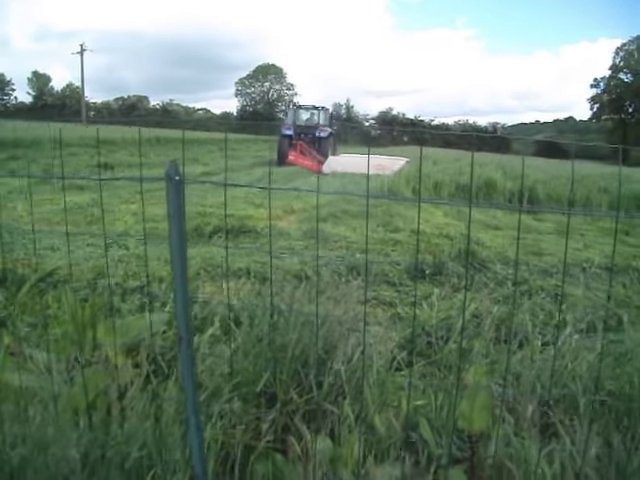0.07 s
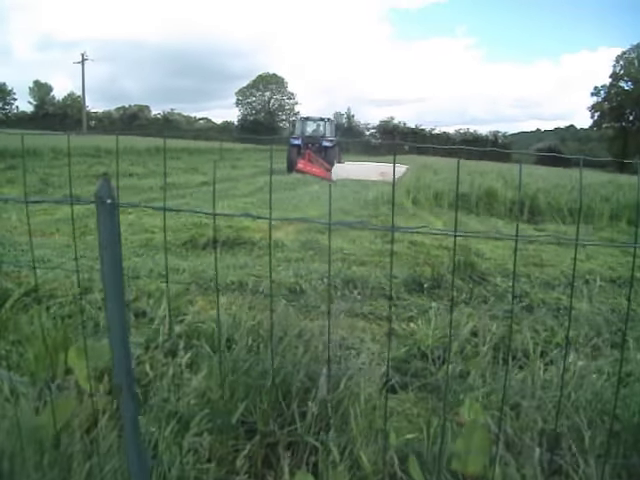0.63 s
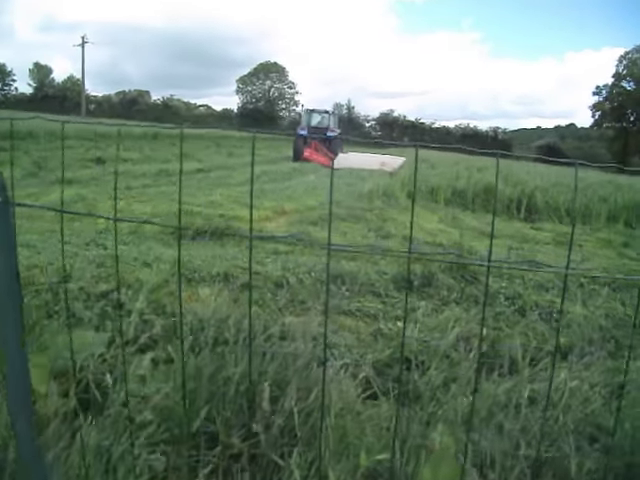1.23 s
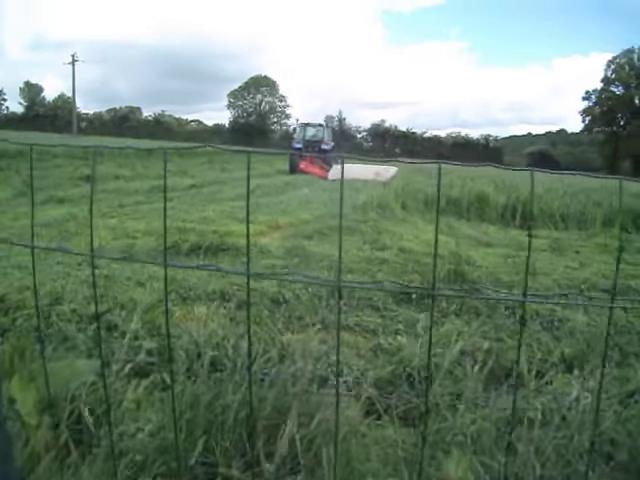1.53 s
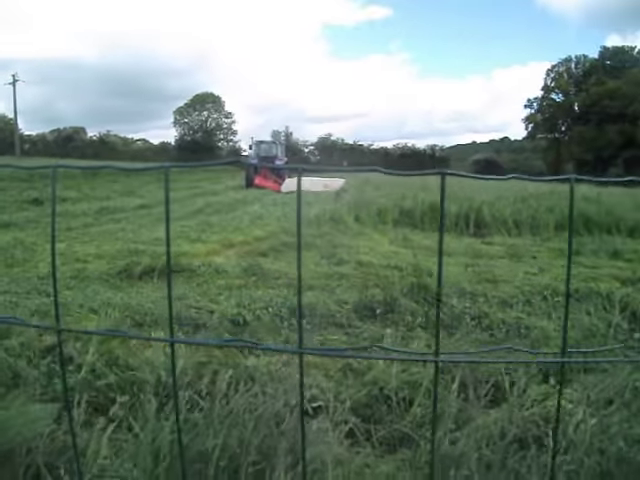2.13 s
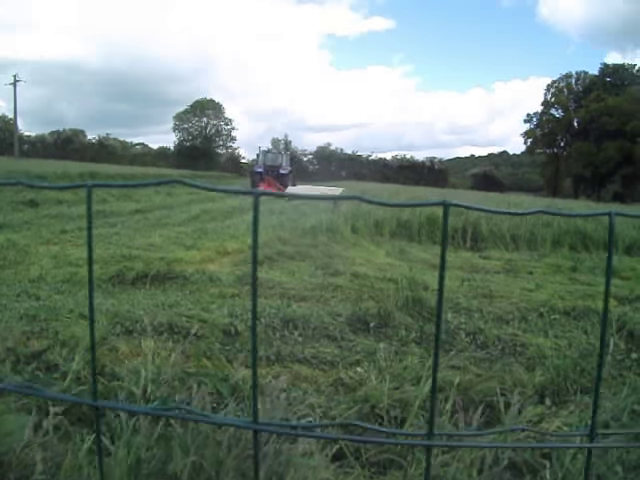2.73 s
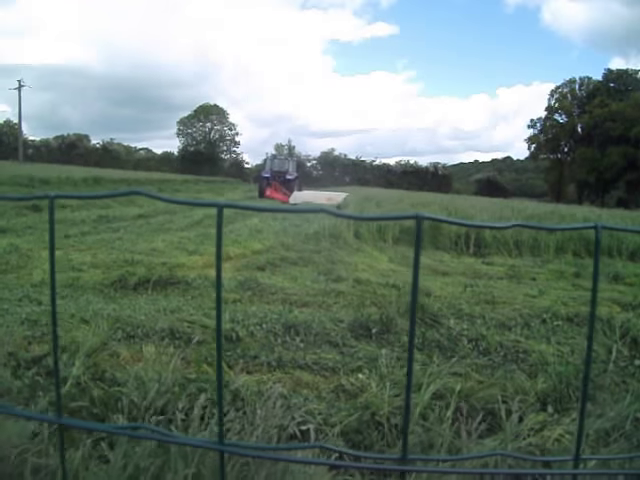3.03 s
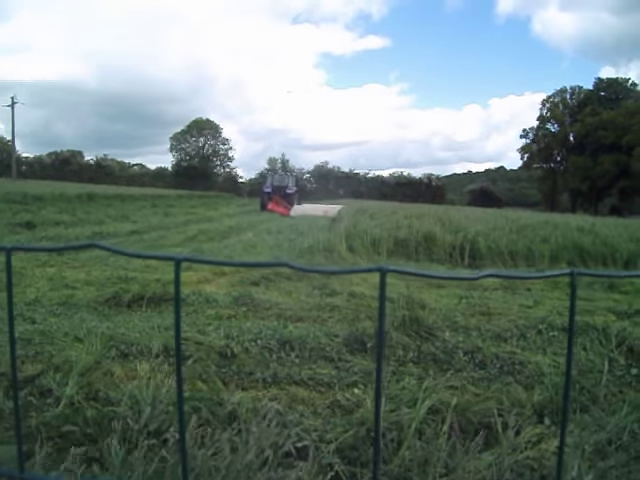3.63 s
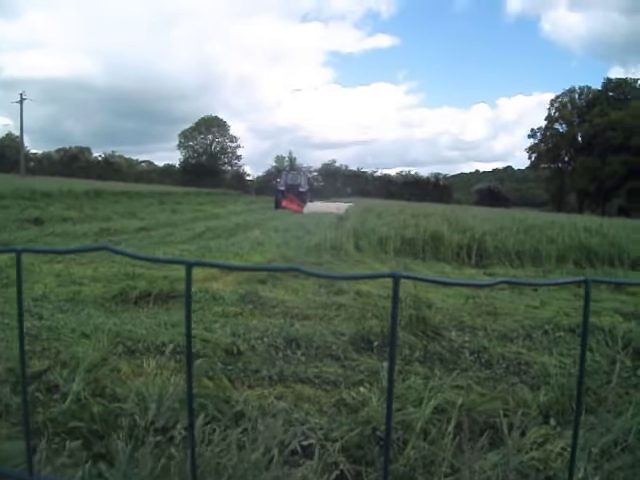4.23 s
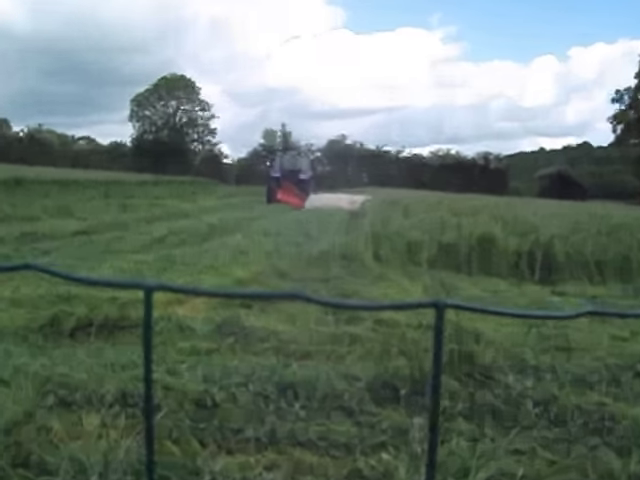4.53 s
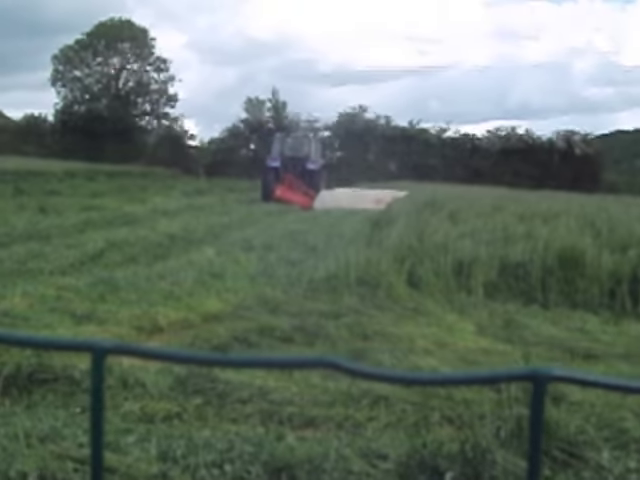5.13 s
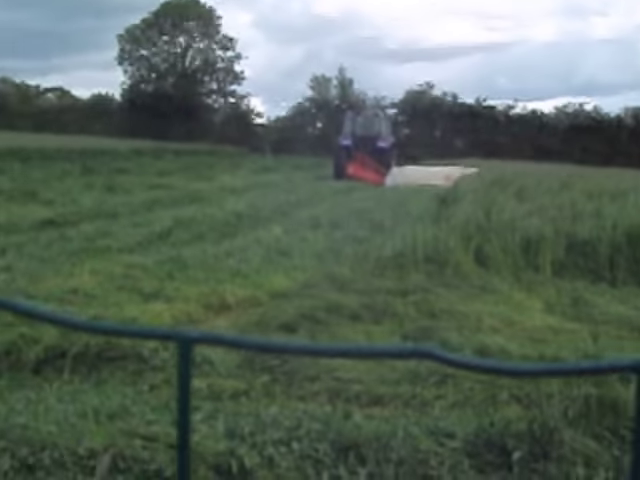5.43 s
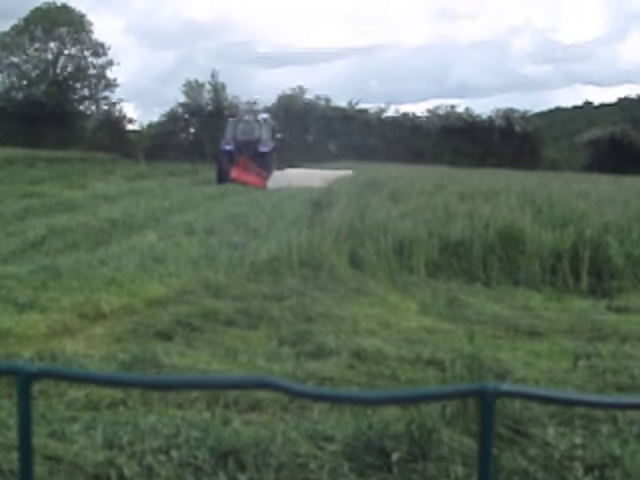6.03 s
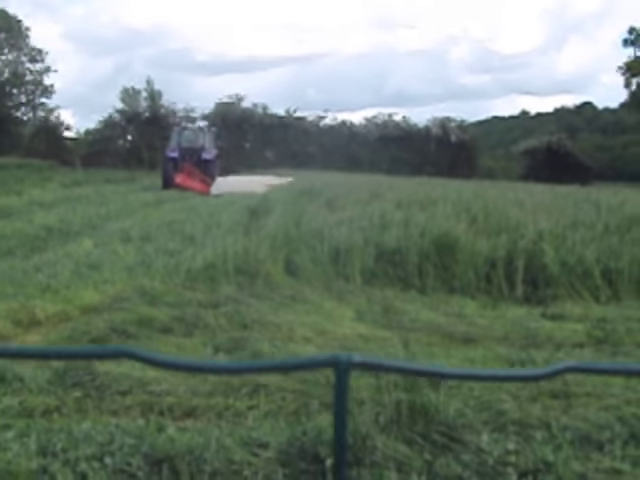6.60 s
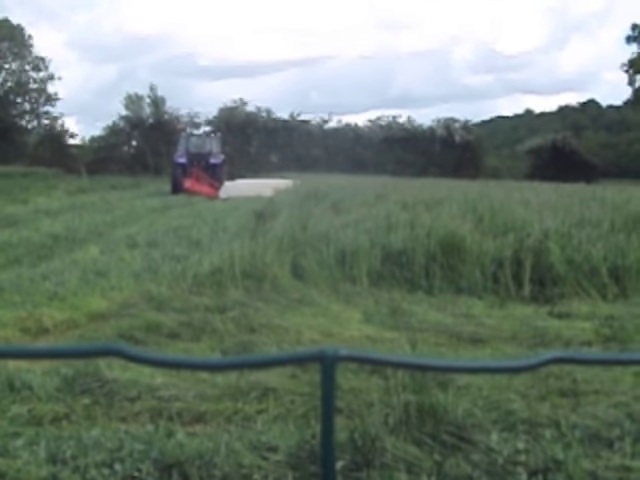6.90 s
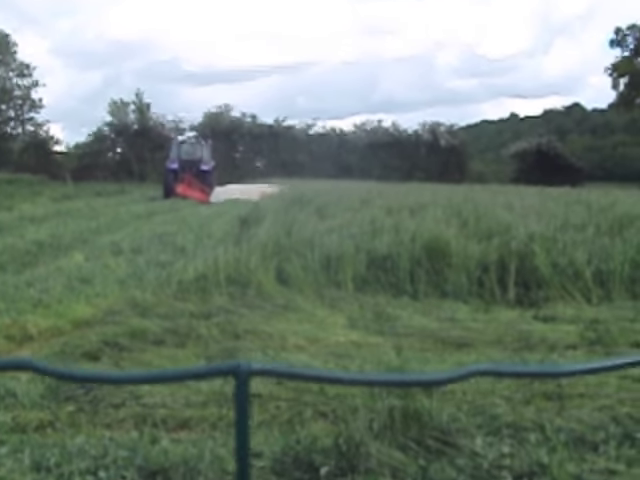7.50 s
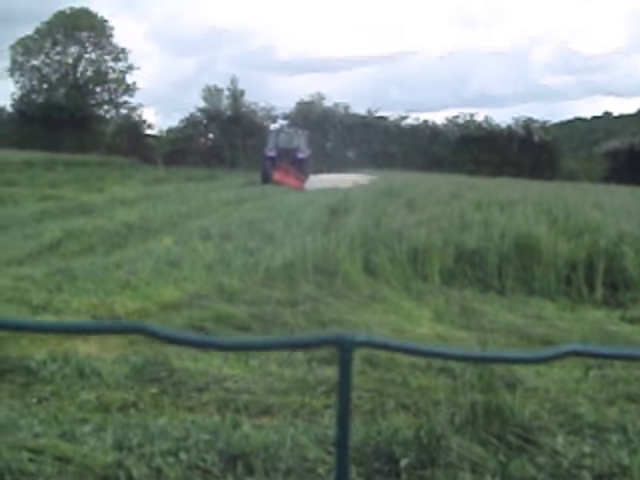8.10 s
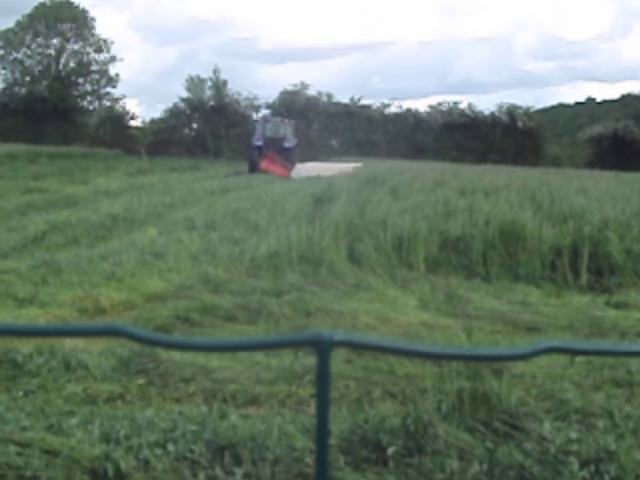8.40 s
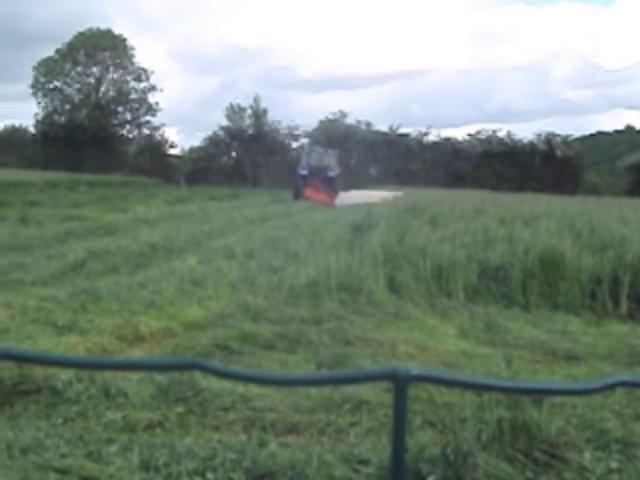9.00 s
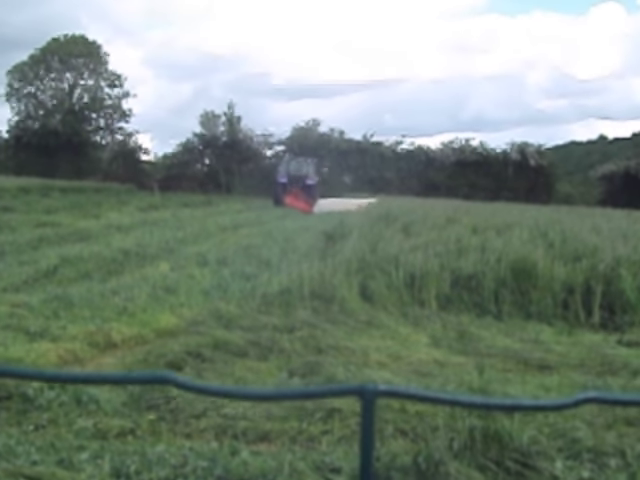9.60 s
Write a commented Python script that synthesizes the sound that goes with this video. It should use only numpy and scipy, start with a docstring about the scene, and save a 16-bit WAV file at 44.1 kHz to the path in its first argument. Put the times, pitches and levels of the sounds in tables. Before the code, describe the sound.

A tractor mowing grass drones and slowly fades as it drives away, with a few sharp handling clicks close to the microphone.

```python
"""A tractor mows a field

A tractor with a disc mower drives away. Its spinning discs drone over the engine's rumble
and the rush of blades tearing grass, while gears whine faintly. Close by, a hand-held
camera clicks and scuffs under the fingers, and a little wind buffets the microphone."""
import sys
import numpy as np
from scipy import signal
from scipy.fft import rfft, irfft
from scipy.io import wavfile

SR = 44100
rng = np.random.default_rng(int(sys.argv[2]) if len(sys.argv) > 2 else 0)


def transcribe(u):
    """Save the signal u as a 16-bit wav file named by the first command-line argument.

    u: samples, shape (n,) or (channels, n), limited to [-1, 1]; the rate is SR.
    q: integer samples, one column per channel.
    """
    v = np.clip(np.atleast_2d(u).T, -1, 1)
    q = np.round(v * 32767).astype(np.int16)
    wavfile.write(sys.argv[1], SR, q)


N = 429975
TIME = np.arange(N) / SR
BINS_HZ = np.fft.rfftfreq(N, 1 / SR)


# The strongest disc tones. A multiple of 2 vibrates twice for each turn of a disc.
# multiple, start_db, loss_per_distance_doubling_db, swell_db, swell_period_s, crest_s
DRONE_TONES = [(2, -24.2, 5.5, 0.45, 3, .05), (4, -22, 8, 0.8, 3.2, 2.5), (6, -27.4, 9.4, 2.5, 4.55, 1.93),
               (8, -32.5, 16, 1.5, 3.16, 2)]
# Brief swells and dips of the lowest of these tones: middle_s, half_length_s, change_db
SURGES = [(.32, 0.089, 1.5), (.78, .07, -3), (2.05, 0.1, -5), (2.52, 0.075, 3), (3.05, 0.18, 2.5),
          (4.9, .1, 2), (6.55, 0.098, -4), (7.2, .15, -3), (8.02, .08, -0.5), (8.83, .08, 3)]

def drone(turns):
    """Two blades on each disc make the even multiples strong; they swell and ebb as they fade."""
    tones = []
    for multiple, start_db, loss_db, swell_db, period_s, crest_s in DRONE_TONES:
        level_db = faded(start_db, loss_db) + swell_db * swing(1 / period_s, crest_s)
        level_db += 0.26 * wander(3.3)
        tone = shaky_tone(multiple * turns, flutter=0.06 + 0.014 * multiple, flutter_hz=6.5)
        tones.append(amp(level_db) * tone)
    # The engine fires slightly off the blade rate, so the lowest tone throbs.
    throb_db = 1.1 * swing(hz=3.315, crest_s=0.027) + bumps(SURGES)
    return amp(throb_db) * tones[0] + sum(tones[1:])


# Weak low disc tones: multiple, level_db (compared with the rumble)
ODD_TONES = [(1, -8), (3, -4), (5, -6)]

def disc_imbalance(turns, rumble_db):
    """Slightly unbalanced discs add odd multiples of their turning rate."""
    tones = sum(amp(db) * shaky_tone(multiple * turns, flutter=0.26, flutter_hz=3)
                for multiple, db in ODD_TONES)
    return amp(rumble_db) * tones


# Higher disc tones, before the overall fade: multiple, near_db, midway_db, far_db
OVERTONES = [(10, -19.5, -8, -16), (11, -42, -20, -22.5), (12, -1, -6, -7), (13, -25.5, -17, -18.5),
             (14, -13, -10, -8.5), (15, -20.5, -17, -13), (16, -5.5, -6, -8), (17, -14.5, -24, -16),
             (18, -19.5, -17.5, -18), (20, -12, -15.5, -14.5), (22, -18.5, -11.5, -15), (24, -30, -17, -20),
             (28, -36.5, -19, -27), (31, -27, -26.5, -21), (32, -21.5, -24, -15), (33, -22, -18.5, -21),
             (34, -25.5, -19, -23)]

def disc_overtones(turns, far):
    """The discs' upper buzz: the higher the tone, the more it flutters."""
    tones = sum(at_distance(far, levels_db)
                * shaky_tone(multiple * turns, flutter=0.0125 * multiple, flutter_hz=3.5)
                for multiple, *levels_db in OVERTONES)
    return amp(faded(start_db=-29, loss_db=12.9)) * tones


# The tone colour of the rumble: pitch_hz, level_db
RUMBLE_COLOUR = [(20, -11), (40, -7.5), (75, -5.5), (130, -1.5), (180, 2), (240, -2), (290, -1), (340, -6),
                 (390, -25.5)]

def engine(rumble_db):
    """The low, rough rumble of the diesel and the mower's hood."""
    return amp(rumble_db + 0.2) * noise(RUMBLE_COLOUR, band_hz=(120, 190))


# The tone colour of cutting, from near and from far: pitch_hz, level_db
NEAR_RUSH_COLOUR = [(440, -7), (560, 0), (750, 4), (950, -5), (1270, 3), (1510, -12.5), (1620, -6.5),
                    (2080, -12.5), (2520, -9), (3150, -20), (3600, -12), (4150, -19), (4600, -12),
                    (5200, -17), (5900, -32)]
FAR_RUSH_COLOUR = [(430, -7.5), (560, -1.5), (750, 0.5), (1020, 1.5), (1270, 0.5), (1480, -7.5),
                   (1680, -4.5), (2000, -9), (2300, -5), (2800, -12), (3100, -15), (4200, -19),
                   (5200, -15.5), (5900, -33.5)]

def grass(turns, far):
    """Blades tear through grass; neighbouring discs alternate, so the rush pulses four times a turn."""
    far_share = far ** 1.5  # the rush keeps its near colour longer than the tones do
    near_rush = noise(NEAR_RUSH_COLOUR, band_hz=(880, 1400))
    far_rush = noise(FAR_RUSH_COLOUR, band_hz=(880, 1400))
    tearing = np.sqrt(1 - far_share) * near_rush + np.sqrt(far_share) * far_rush
    lows = irfft(rfft(tearing) / (1 + (BINS_HZ / 3000) ** 12), N)  # the part below 3000 Hz
    pulsing = 1 + 0.21 * (1 - 0.44 * far_share) * np.cos(2 * np.pi * 4 * turns)
    rush = amp(faded(start_db=-33.45, loss_db=11)) * pulsing * lows
    hiss = amp(faded(start_db=-44, loss_db=7.6)) * unit(tearing - lows)
    tufts = amp(0.61 * wander(22))  # thick and thin grass
    return tufts * (rush + hiss)


# Gear tones: pitch_hz, near_db, midway_db, far_db
GEAR_WHINES = [(629.5, -40.5, -47, -50.5), (697, -49, -51.5, -54.5), (732, -48.5, -54, -48),
               (1134, -42, -50, -57.5), (1273, -42.5, -46.5, -59.5), (1545, -63.5, -70.5, -55.5),
               (1894, -53.5, -60, -71.5), (2265, -52.5, -60.5, -63), (2556, -58, -61, -67.5),
               (2830, -70.5, -69, -64), (3140, -59, -69, -73.5), (4570, -61, -61, -75)]

def gears(turns, far):
    """Unsteady whines that follow the speed of the shaft."""
    shaft_time = turns / turns[-1] * TIME[-1]  # a clock that runs faster when the shaft does
    return sum(at_distance(far, levels_db) * shaky_tone(hz * shaft_time, flutter=0.6, flutter_hz=5)
               for hz, *levels_db in GEAR_WHINES)


# Taps on the shell: start_s, peak_db, pitch_hz, brightness_hz (high for a nail, low for a fingertip)
CLICKS = [(3.916, -22, 2940, 4000), (3.938, -13, 2980, 3540), (3.94, -9, 2950, 4500),
          (3.9437, 6.5, 2680, 3900), (3.94444, 2.5, 2580, 3470), (4.032, -13, 2820, 5000),
          (4.4565, -8.5, 2390, 5000), (5.019, -22.5, 2710, 4000), (5.123, -16.5, 2390, 3800),
          (5.296, -17, 2900, 3500), (5.55, -14.5, 2780, 4000), (5.6345, -26, 3080, 4020),
          (5.6688, -12, 3120, 4970), (5.6697, -19, 4600, 4770), (7.9895, -15.5, 3120, 3220),
          (8.539, -17, 2600, 3130), (8.5415, -18.5, 2620, 3040)]
# The ways the shell rings: pitch_multiple, level_db, ring_s (time to fall by 60 dB)
SHELL_RINGS = [(.73, -27, 0.0076), (.93, -31.5, 0.0053), (1, 1.5, 0.019), (1.13, 8.5, 0.0055),
               (1.4, 4.5, 0.0065), (1.71, -3, 0.011), (1.92, -25, .008)]

def clicks():
    """Nails and fingertips click on the camera's plastic shell."""
    return taps(CLICKS, SHELL_RINGS, rattle_db=-24, rattle_s=0.012)


# Bumps on the body: start_s, peak_db, lowest_pitch_hz, brightness_hz
KNOCKS = [(3.944, -12, 624, 1470), (3.978, -17.5, 480, 2010), (4.456, -16.5, 610, 2020),
          (5.123, -9, 554, 1520), (5.296, -17.5, 480, 1500), (5.6525, -17.5, 374, 600),
          (5.6558, -19.5, 370, 500), (5.67, -18, 400, 1500)]
# The ways the body rings: pitch_multiple, level_db, ring_s
BODY_RINGS = [(1, 3.5, 0.023), (1.7, 12.5, 0.009), (2.25, 2.5, 0.0099), (2.85, -18, 0.01)]

def knocks():
    """Fingers knock on the camera's body, which rings lower and duller."""
    return taps(KNOCKS, BODY_RINGS, rattle_db=-21.5, rattle_s=0.031)


# Finger slides: start_s, length_s, level_db, squeak_hz
SLIDES = [(3.897, 0.092, -35, 3100), (3.97, 0.036, -28, 2980), (4.036, 0.094, -36.5, 3680),
          (5.292, 0.092, -33.5, 3030), (5.547, 0.03, -32, 3000), (5.641, 0.051, -35, 4400),
          (7.987, 0.019, -18.5, 3340), (7.996, 0.1, -36, 4000), (8.067, 0.207, -38, 3040),
          (8.253, .11, -36.5, 3130), (8.39, 0.064, -41, 3050)]
# The tone colour of rubbing skin: pitch_hz, level_db
FRICTION_COLOUR = [(1200, -24.5), (2100, -6), (2800, 6), (3400, 2.5), (3950, 2), (4600, -3.5), (5300, -5.5),
                   (6000, -35)]

def scuffs():
    """Skin sticks and slips on the shell, making a grainy hiss with a squeak."""
    friction = noise(FRICTION_COLOUR, band_hz=(2700, 4300))
    grain = amp(-3.5 + 1.4 * wander(90))
    white, out = rng.standard_normal(N), np.zeros(N)
    press_s, release_s = 0.015, 0.024
    for start_s, length_s, db, squeak_hz in SLIDES:
        during = (TIME > start_s) & (TIME < start_s + length_s)
        t = TIME[during] - start_s
        pressure = np.minimum(t / press_s, 1) * np.minimum((length_s - t) / release_s, 1)
        rub = unit(resonate(friction[during], squeak_hz, width_hz=2900))
        squeak = unit(resonate(white[during], squeak_hz, width_hz=220))
        out[during] += amp(db) * pressure * grain[during] * (amp(-2.5) * rub + amp(-4) * squeak)
    return out


# Gusts on top of the breeze: middle_s, half_length_s, boost_db
GUSTS = [(.2, .2, 9), (2.2, 0.5, 11.5), (9.75, 0.26, 8)]

def wind():
    """Moving air buffets the microphone with a low, lumpy noise."""
    buffet = noise([(12, 0), (30, -2), (60, -4), (110, -7), (200, -20)], band_hz=(20, 85))
    breeze_db = -49 + 3 * wander(4.3)
    return amp(breeze_db + bumps(GUSTS)) * buffet


def taps(blows, rings, rattle_db, rattle_s):
    """Each blow makes plastic ring for a moment; the parts chatter briefly after it."""
    t, out = np.arange(0, 0.06, 1 / SR), np.zeros(N)
    decay = -np.log(1000) * t  # a fall of 60 dB a second
    for start_s, peak_db, hz, brightness_hz in blows:
        ring = sum(amp(db) * np.exp(decay / ring_s) * np.sin(2 * np.pi * hz * multiple * t)
                   for multiple, db, ring_s in rings)
        chatter = amp(rattle_db) * rng.standard_normal(len(t)) * np.exp(decay / rattle_s)
        force = (t == 0) + chatter
        softness = signal.butter(4, brightness_hz, fs=SR, output="sos")
        tap = signal.sosfilt(softness, signal.fftconvolve(force, ring))
        start = round(start_s * SR)
        out[start:start + len(tap)] += amp(peak_db) * tap / abs(tap).max()
    return out


def shaky_tone(cycles, flutter, flutter_hz):
    """A pure tone whose level and timing are shaken by moving air and uneven load."""
    drift = 0.27 * wander(0.58)  # the sound's path over the ground slowly changes
    angle = 2 * np.pi * (cycles + rng.random()) + drift
    level_shake = flutter * wander(flutter_hz)
    timing_shake = flutter * wander(flutter_hz)
    shaken = (1 + level_shake) * np.cos(angle) + timing_shake * np.sin(angle)
    return shaken * np.sqrt(2 / (1 + 2 * flutter ** 2))


def faded(start_db, loss_db):
    """The level as the tractor drives steadily away, losing loss_db each time the distance doubles."""
    start_m, speed_m_per_s = 20.2, 2.97
    return start_db - loss_db * np.log2(1 + speed_m_per_s * TIME / start_m)


def at_distance(far, levels_db):
    """Blends near, midway and far levels; the ground's echo treats each pitch differently."""
    return amp(np.interp(far, [0, 0.5, 1], levels_db))


def noise(colour, band_hz):
    """Noise shaped by (pitch_hz, level_db) points, with strength 1 inside the band."""
    hz, db = np.transpose(colour)
    gain = amp(np.interp(np.log(BINS_HZ + 1), np.log(hz), db))
    gain /= 1 + (BINS_HZ / hz[-1] / 1.15) ** 16  # steep fall above the last point
    gain /= 1 + (hz[0] / 1.3 / (BINS_HZ + 1)) ** 8  # and below the first
    spectrum = rfft(rng.standard_normal(N)) * gain
    inside = (BINS_HZ > band_hz[0]) & (BINS_HZ < band_hz[1])
    return irfft(spectrum, N) / irfft(spectrum * inside, N).std()


def resonate(x, hz, width_hz):
    """Lets through the part of a sound near one pitch."""
    spin = np.exp(2j * np.pi * hz * np.arange(len(x)) / SR)
    feedback = np.exp(-np.pi * width_hz / SR)
    return 2 * (spin * signal.lfilter([1 - feedback], [1, -feedback], x / spin)).real


def wander(rate_hz):
    """A smooth random wobble of strength 1, with about rate_hz swings a second."""
    step = 100
    grid = np.arange(0, N + step, step)
    hz = np.fft.rfftfreq(len(grid), step / SR)
    spectrum = rfft(rng.standard_normal(len(grid))) / (1 + (hz / rate_hz) ** 2)
    return np.interp(np.arange(N), grid, unit(irfft(spectrum, len(grid))))


def swing(hz, crest_s):
    """A steady swing between -1 and 1, at its top at crest_s."""
    return np.cos(2 * np.pi * hz * (TIME - crest_s))


def bumps(rows):
    """Smooth rises and dips in decibels."""
    return sum(db * np.exp(-((TIME - middle_s) / half_s) ** 2) for middle_s, half_s, db in rows)


def curve(rows):
    """Joins (time_s, value) points with straight lines."""
    return np.interp(TIME, *np.transpose(rows))


def amp(db):
    """Turns decibels into a volume multiplier."""
    return 10 ** (np.asarray(db) / 20)


def unit(x):
    """Scales a signal to an average strength (rms) of 1."""
    return x / np.sqrt(np.mean(x ** 2) + 1e-20)


# How fast the discs spin: time_s, turns_per_s
DISC_SPEED = [(0, 51.6), (.6, 51.64), (0.9, 51.53), (1.2, 51.9), (2.45, 52.0), (3.1, 51.77), (3.55, 51.57),
              (3.85, 51.8), (5, 51.9), (5.3, 51.55), (5.9, 51.47), (6.2, 51.66), (6.55, 51.35),
              (7.35, 51.87), (8.2, 51.68), (8.75, 51.85), (9.75, 51.74)]
# How far away the mower sounds: time_s, far_share (0 is near, 1 is far)
FARNESS = [(0, 0), (1.4, 0.02), (2.3, 0.4), (3.2, 0.42), (5.6, .55), (6, 1), (9.75, 0.79)]
# Uneven ground lets more or less of the mower's upper sound through: time_s, change_db
GROUND_EFFECT = [(0, 0), (.9, .5), (1.9, 1.1), (2.6, -0.9), (3.3, -1), (4, -0.5), (5.2, -0.5), (6, 0.6),
                 (7.2, -0.7), (8.5, 0.4), (9.75, 0)]

def scene():
    """The tractor and mower move away, with fingers and wind close by."""
    turns = np.cumsum(curve(DISC_SPEED)) / SR  # disc turns so far
    far = curve(FARNESS)
    rumble_db = faded(start_db=-35, loss_db=7.54)
    low = drone(turns) + disc_imbalance(turns, rumble_db) + engine(rumble_db)
    upper = disc_overtones(turns, far) + grass(turns, far) + gears(turns, far)
    close_by = clicks() + knocks() + scuffs() + wind()
    return (low + amp(curve(GROUND_EFFECT)) * upper + close_by)[None]


def record(dry):
    """The loudest click overloads the microphone's input; then the highest treble is cut away."""
    overloaded = np.clip(dry, -1, 1)
    treble_cut = signal.firwin(401, cutoff=6000, window=("kaiser", 8), fs=SR)
    return signal.oaconvolve(overloaded, treble_cut[None], "same")


dry = scene()
out = record(dry)
transcribe(out)
```